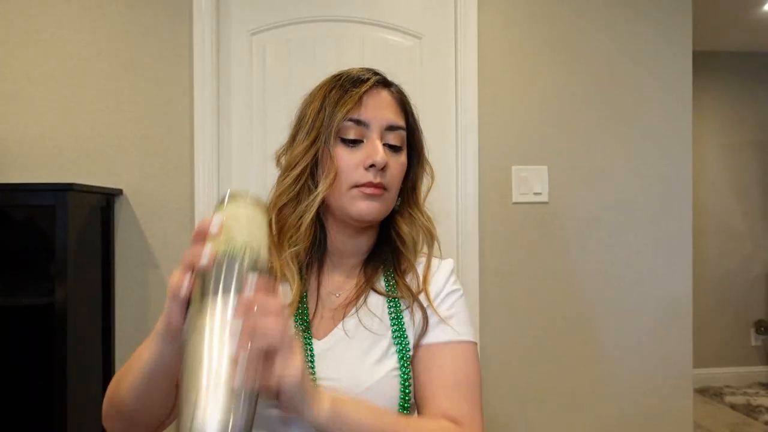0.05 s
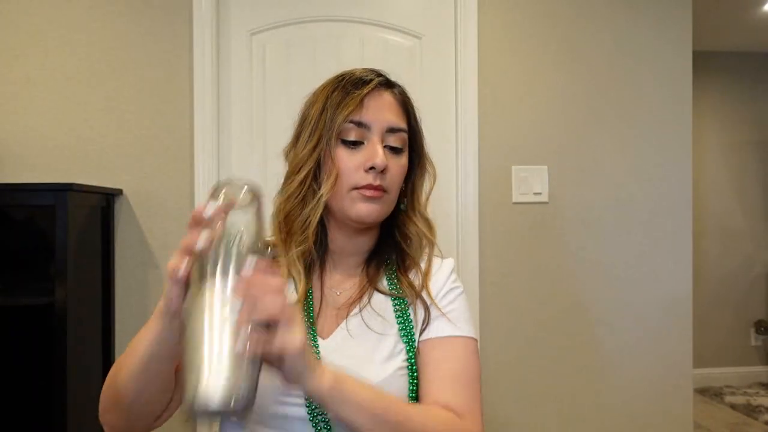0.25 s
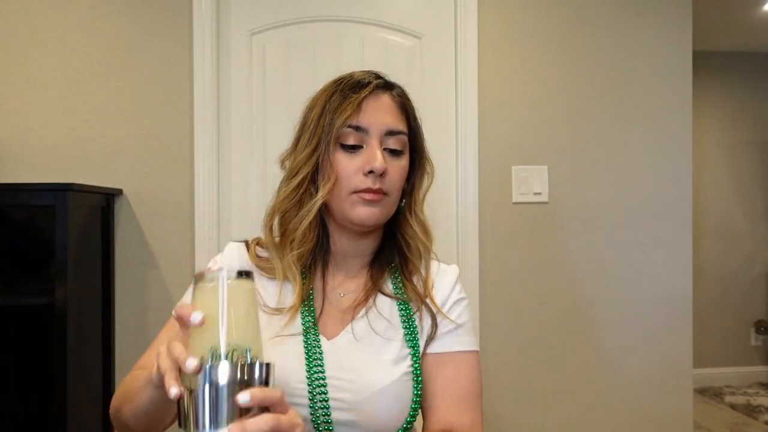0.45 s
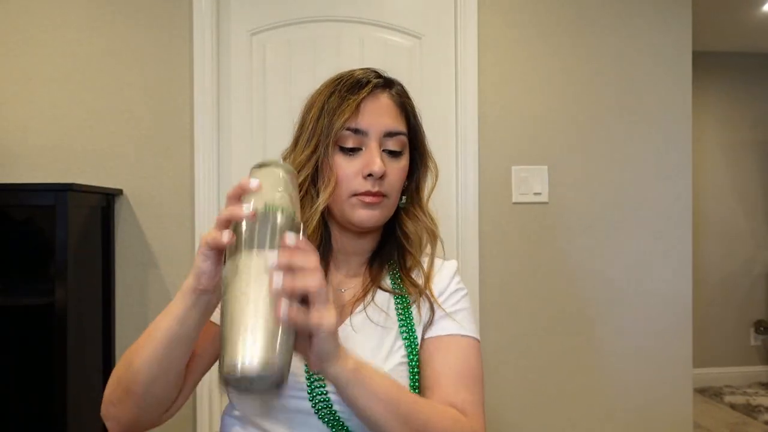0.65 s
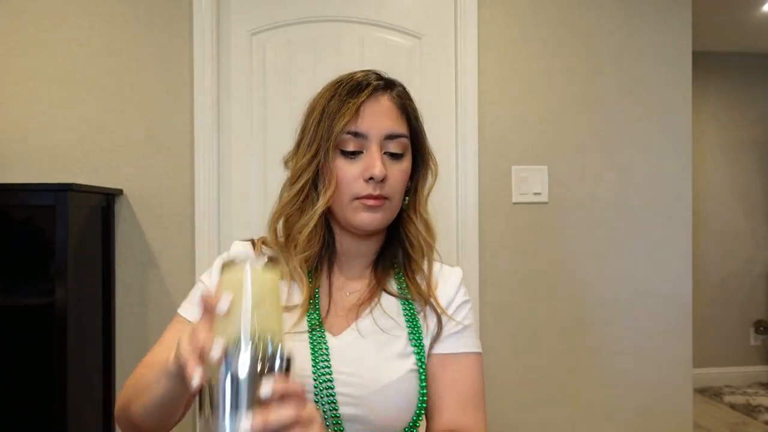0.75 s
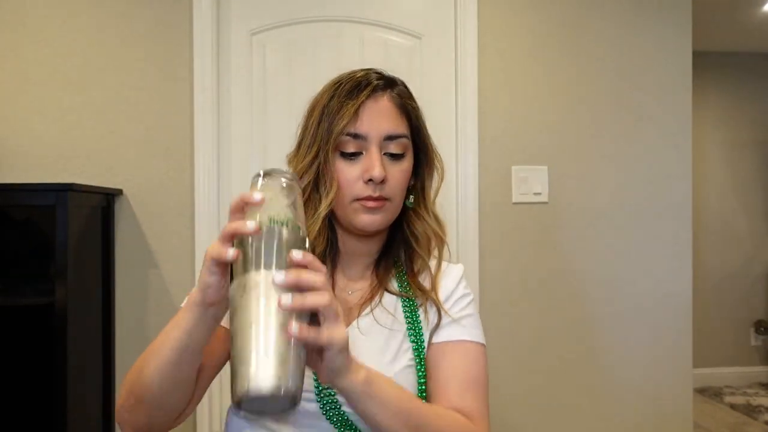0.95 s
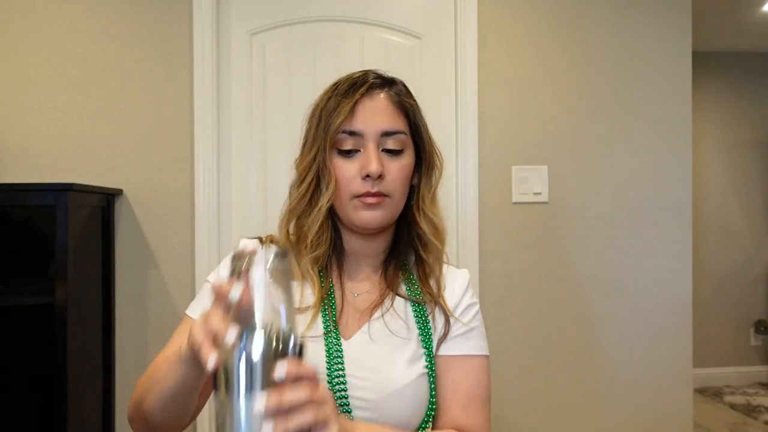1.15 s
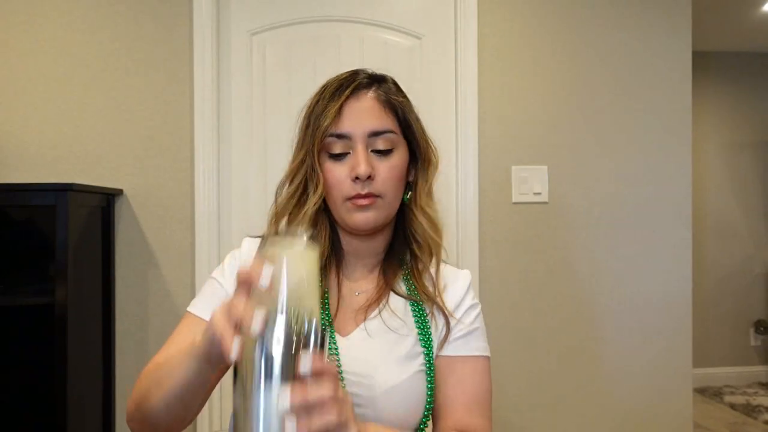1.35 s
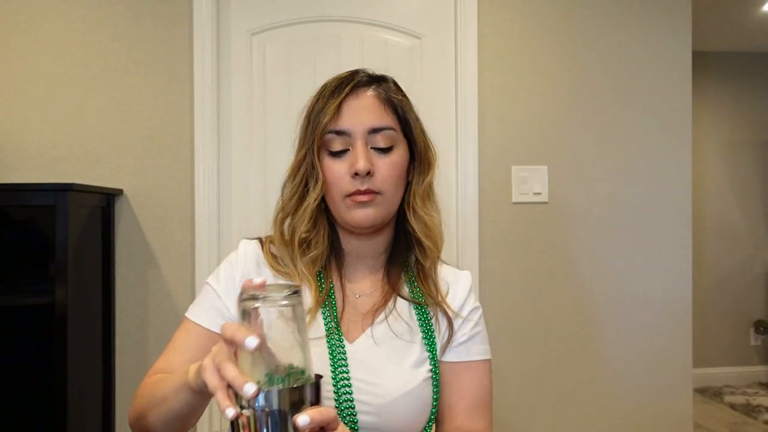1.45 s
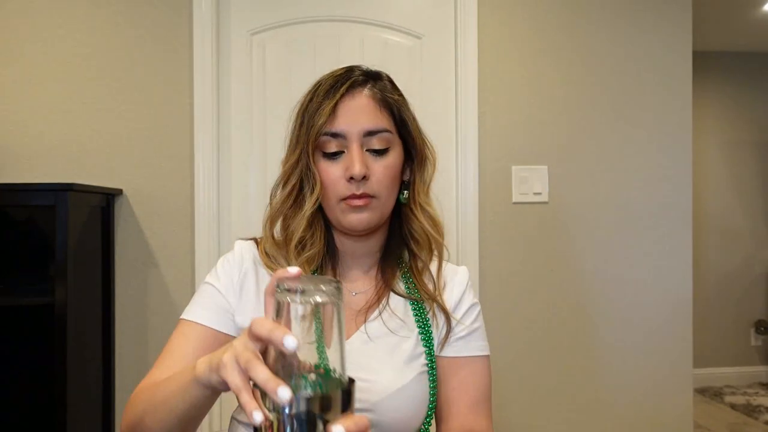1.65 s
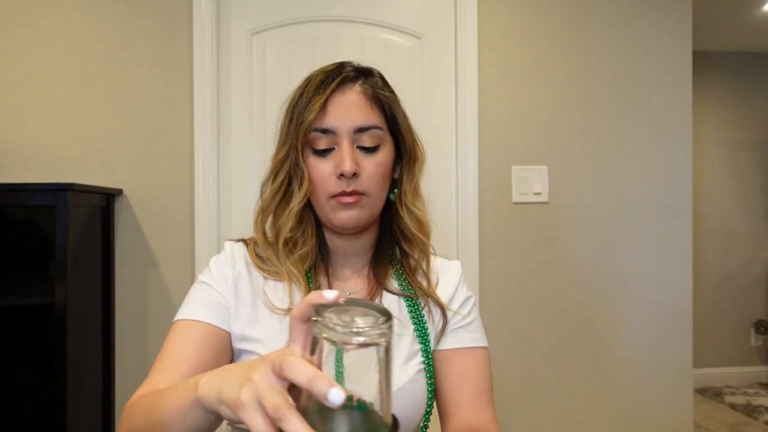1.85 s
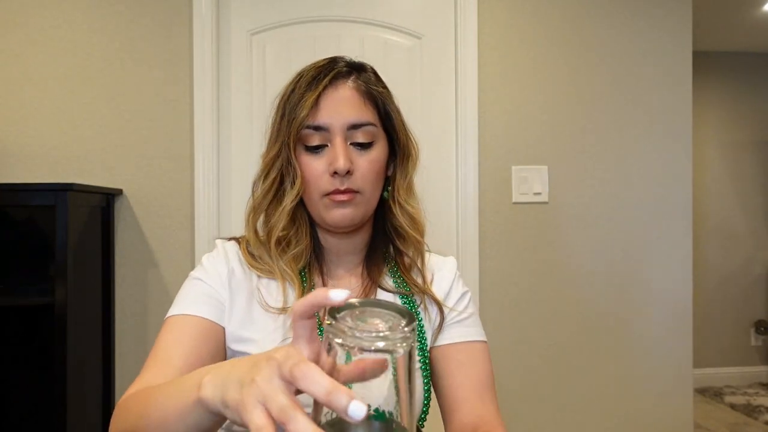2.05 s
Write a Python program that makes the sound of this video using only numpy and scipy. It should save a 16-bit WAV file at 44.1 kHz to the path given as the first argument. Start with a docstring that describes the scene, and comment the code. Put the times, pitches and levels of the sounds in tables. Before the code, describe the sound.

Ice cubes and liquid are shaken hard in a metal cocktail shaker from the start, about three shakes a second, each stroke end giving a wet thud, dense clatter and hissy spray. Sharp glassy cube hits crowd in from 0.1 s, with heavy base knocks near 0.2, 0.9 and 1.2 s. The last stroke lands at 1.5 s; final knocks at 1.7-1.9 s fade into kitchen reflections and low hum.

```python
"""In a kitchen, ice and liquid are shaken in a metal tin about three times a second; room hum lies beneath.
From the start each end of a stroke thuds, clatters and sprays (filtered random clicks) while cubes tumble.
Hard cube hits (cracks and short rings) join at once, knocks on the base (damped modes) from 0.2 s.
The last stroke lands at 1.5 s; the last knocks fall by 1.9 s and the room dies away.
Heard in stereo, a touch left of centre, with diffuse reflections 2.5 ms behind the direct sound."""
import sys
import numpy as np
from scipy import signal
from scipy.fft import rfft, irfft
from scipy.io import wavfile
from scipy.ndimage import uniform_filter1d, minimum_filter1d

SR = 44100
rng = np.random.default_rng(int(sys.argv[2]) if len(sys.argv) > 2 else 0)


def wav_out(sig):
    """Save sig, one row per channel (or a flat mono array), as 16-bit PCM at SR to the path in sys.argv[1]."""
    wavfile.write(sys.argv[1], SR, np.round(np.clip(np.atleast_2d(sig).T, -1, 1) * 32767).astype(np.int16))


N = 92742
T = np.arange(N) / SR   # time in s

# The load reaches the bottom and the top in turn; a negative delay puts the spray first:
# start_s [s], thud_db [dB], clatter_db [dB], spray_db [dB], spray_delay_s [s]
STROKE_LANDINGS = [(-.03, -35.5, -26, -28.5, -0.013), (0.063, -38.5, -30, -28.5, -0.016),
                   (0.228, -38.5, -23, -30, 0.033), (0.427, -38, -30.5, -31, -0.056),
                   (0.555, -29, -27, -28.5, 0.003), (.762, -51, -45, -32, -0.045),
                   (0.885, -35.5, -25, -26.5, 0.017), (1.014, -44.5, -32.5, -27, .003),
                   (1.19, -32, -25.5, -28, -0.0024), (1.359, -66, -35.5, -34, 0.0086),
                   (1.517, -29, -30.5, -34, 0.025)]
# How hard the loose cubes tumble: time_s [s], level_db [dB]
TUMBLE_LEVEL = [(0, -27), (.18, -33), (.28, -24.5), (.42, -30.5), (.6, -24.5), (.705, -27.5), (.77, -25.5),
                (.85, -28), (.93, -25), (1.25, -27.5), (1.345, -43), (1.39, -27), (1.655, -27.5),
                (1.7, -45), (1.785, -49), (1.815, -32.5), (2.1, -74)]
# Single hard hits of a cube on the wall: start_s [s], level_db [dB], pitch_hz [Hz], crack_db [dB re the ring]
HARD_CUBE_HITS = [(0.065, -26.5, 4650, 18), (0.0958, -6.5, 5230, -5), (.1100, -7.5, 3900, -6),
                  (0.144, -7.5, 4000, -9), (0.1896, -7.5, 3180, -17), (0.2049, -5.5, 3330, -3.5),
                  (0.3027, -12.5, 2340, -6), (0.3274, -9.5, 3270, -3), (0.381, -12, 3150, 6.5),
                  (.3996, -14, 2200, 2), (.4294, -7, 2300, -2), (0.4488, -7, 3070, -11),
                  (0.4604, -8.5, 4270, -8.5), (0.468, -7, 3160, -20), (0.512, -4, 3360, -26),
                  (0.5546, -8.5, 2340, -7), (0.5628, -8, 3280, -15), (0.576, -9.5, 2550, -9),
                  (.6010, -11.5, 2150, -2), (.6436, -11, 3600, -19), (.7190, -10, 2970, 10),
                  (0.7632, -6, 3680, -5.5), (0.78, -10, 3900, -17), (0.8266, -5.5, 3280, -13),
                  (.8605, -9, 3130, -7), (.8930, -19, 1960, 14.5), (.9420, -14, 4500, 8.5),
                  (1.0140, -19.5, 2150, 13.5), (1.0437, -8, 2190, -10), (1.065, -4, 4160, -3.5),
                  (1.1167, -12.5, 2140, 0), (1.1573, -12, 2130, -1), (1.17, -14.5, 6500, 7.5),
                  (1.215, -10.5, 3120, -13), (1.2761, -12, 1800, 4.5), (1.3260, -16.5, 4400, 9),
                  (1.3607, -6, 4160, -8.5), (1.382, -11, 6860, 8), (1.3997, -12, 2770, 2),
                  (1.4200, -11, 4280, -15), (1.5017, -18, 2150, -2), (1.5215, -9, 2250, 0.5),
                  (1.5316, -19, 2770, 4), (1.5452, -5.5, 2870, -8), (1.564, -6, 2880, -10),
                  (1.8384, -21, 3000, -27)]
# Heavy knocks on the base:
# start_s [s], level_db [dB], main_note_t60_s [s], overtones_db [dB re the main note]
BASE_KNOCKS = [(0.231, -7, 0.0052, -2), (.2380, -5, 0.0077, -15), (0.8858, 3, 0.0032, -11.5),
               (0.8884, -8.5, 0.0082, 0), (1.1794, -8, 0.025, -24), (1.183, -3, 0.032, -11),
               (1.2102, 0.5, 0.0085, -11), (1.6987, -2, 0.0069, -3), (1.7470, -23, 0.007, 14),
               (1.7982, -24, 0.025, 13), (1.8088, -3, 0.0052, 2.5), (1.905, -31, 0.0033, 14)]
# Modes of the base besides its main note: pitch_hz [Hz], level_db [dB], t60_s [s]
BASE_OVERTONES = [(628, -24.5, 0.053), (992, -27.5, 0.045), (1310, -11.5, 0.0058), (2150, -9, 0.0065),
                  (4440, -9.5, 0.0028)]
# Long rings of the tin, damped by the hands: pitch_hz [Hz], level_db [dB], t60_s [s]
TIN_RING_MODES = [(499.2, -44.5, 0.024), (587, -46.5, 0.2), (1255, -42.5, 0.034), (1672, -43, 0.21),
                  (1743, -61, 0.13), (1970, -54.5, 0.043), (2191, -41.5, 0.079), (2300, -68.5, 0.097),
                  (2972, -40, 0.025), (3190, -41.5, 0.033), (4240, -35, 0.049), (5500, -35.5, 0.023)]
# Colours, all as frequency_hz [Hz], density_db [dB per Hz]
# Thud of the liquid load
THUD_COLOUR = [(60, -33.5), (150, -31), (330, -7), (500, 4.5), (1000, 4.5), (1600, 4.5), (4000, -28)]
# Clatter of cubes at a landing
CLATTER_COLOUR = [(200, -39.5), (600, -18), (1100, 2), (1750, 3), (2300, 6), (3500, -3.5), (7000, -13.5)]
# Rattle of the tumbling cubes
RATTLE_COLOUR = [(100, -55), (400, -22), (1500, -8), (2200, 0.5), (2600, -3.5), (3150, 2), (4200, -5.5),
                 (4800, -9.5), (10000, -11), (16000, -29.5)]
# Spray and ice chips
SPRAY_COLOUR = [(500, -51), (2000, -20), (4000, 1.5), (6700, 5), (12000, -3.5), (16000, -18.5)]
# Brittle crack of a hard hit
CRACK_COLOUR = [(150, -67.5), (700, -5.5), (2000, -2.5), (7000, 3.5), (11000, -8.5), (16000, -16)]
# Room hum with its faint hiss
HUM_COLOUR = [(25, -5), (100, -4), (210, 8.5), (350, 8.5), (900, -10.5), (9000, -22)]
# Decay of the kitchen: frequency_hz [Hz], t60_s [s]
ROOM_DECAY = [(200, 1), (1500, 0.63), (4000, 0.57), (8000, 0.25), (14000, 0.04)]
# Reflections against the direct sound: frequency_hz [Hz], level_db [dB re direct]
ROOM_LEVEL = [(200, -6.5), (1500, -8), (4000, -6.5), (14000, -11.5)]
# Stereo width of the reflections: frequency_hz [Hz], side_db [dB re mid]
ROOM_WIDTH = [(200, -12), (700, -11), (5000, -3), (14000, 2.5)]
# Bands that the wall of the tin holds back briefly: centre_hz [Hz], width_hz [Hz]
WALL_DELAY_BANDS = [(2000, 1450), (3400, 3500), (6500, 2100)]

# Each envelope: rise in s, time from onset to the fall in s, fall in dB per s
THUD_ENVELOPE = dict(attack_s=0.021, hold_s=0.053, fall_db_per_s=178)
CLATTER_ENVELOPE = dict(attack_s=0.0015, hold_s=0.038, fall_db_per_s=112)
SPRAY_ENVELOPE = dict(attack_s=0.01, hold_s=0.031, fall_db_per_s=114)
CHATTER_ENVELOPE = dict(attack_s=0.00083, hold_s=0.0056, fall_db_per_s=483)
CHATTER_DB = -16           # small contacts set off by a hard hit, re that hit
CHATTER_PER_CRACK = 0.36   # dB of chatter per dB of crack: brittle hits scatter more chips
CUBE_RING_CYCLES, HIT_RING_CYCLES, CRACK_T60_S = 8.3, 28.4, 0.0064   # cycles to fall 60 dB
FIRM_DB, GENTLE_TOP_HZ = -35, 9600   # contacts weaker than this lose their treble
BUNCHES_PER_S, BUNCH_T60_S = 64, 0.01   # cubes collide in bunches
BUNCH_BASE = 0.62          # steady rattle between the bunches, before scaling to rms 1
BASE_NOTE_HZ = 1775
KNOCK_TOP_HZ = 8040        # wet, blunt contact
RADIATION_HZ = 154         # the small tin radiates little below this
SHAKE_HZ = 3.1
FIRST_ECHO_S, PAN_DB = 0.0025, 0.32   # left raised and right lowered by PAN_DB
HUM_DB = -57
LIMIT_DB, LIMIT_WINDOW_S = -5.5, 0.002
CUTOFF_HZ = 15900


def from_db(db):
    """Decibels to gain."""
    return 10 ** (np.asarray(db) / 20)


def rms_one(x):
    """Scale to an rms of 1."""
    return x / np.sqrt(np.mean(x ** 2) + 1e-20)


def at_hz(points, hz):
    """Read a table on a log-frequency axis."""
    frequency_hz, value = np.transpose(points)
    return np.interp(np.log(np.maximum(hz, 1)), np.log(frequency_hz), value)


def filtered(x, kind, hz, order=2):
    """Butterworth filter: low, high or band."""
    return signal.sosfilt(signal.butter(order, hz, kind, fs=SR, output="sos"), x)


def coloured(x, spectrum, size=2048):
    """Causal (minimum-phase) filter with the given spectrum."""
    level_db = at_hz(spectrum, np.fft.rfftfreq(size, 1 / SR))
    cepstrum = irfft(np.log(from_db(level_db)))
    # folding the cepstrum forward in time gives minimum phase
    cepstrum[1:size // 2] *= 2
    cepstrum[size // 2 + 1:] = 0
    impulse = irfft(np.exp(rfft(cepstrum)))
    return signal.fftconvolve(x, impulse)[:N]


def ring(x, hz, t60):
    """Two-pole resonator: a unit click sets a dying sine of height 1 ringing."""
    r = from_db(-60 / (t60 * SR))
    w = 2 * np.pi * hz / SR
    return signal.lfilter([0, np.sin(w)], [1, -2 * r * np.cos(w), r * r], x + 1e-18)


def struck(hz, t60, size=4096):
    """One dying sine; a small body radiates little below its pitch."""
    tone = np.sin(2 * np.pi * hz * T[:size]) * from_db(-60 * T[:size] / t60)
    return filtered(tone, "high", hz / 2)


def add(out, start_s, sound):
    """Mix a sound in at its start time."""
    i = int(np.clip(start_s * SR, 0, N - 1))
    out[i:i + len(sound)] += sound[:N - i]


def contacts(per_s, spread_db):
    """Random clicks of uneven size and either sign; rms 1."""
    born = rng.random(N) < per_s / SR
    size = from_db(-spread_db * rng.random(N))
    return rms_one(born * size * rng.choice([-1, 1], N))


def surges(times, levels_db, attack_s, hold_s, fall_db_per_s):
    """Envelope of a row of events: each swells, holds and dies; their powers add."""
    age = T - times[:, None]
    swell = np.clip(age / attack_s, 0, 1)
    fall_db = fall_db_per_s * np.maximum(age - hold_s, 0)
    gain = swell * from_db(levels_db[:, None] - fall_db)
    return np.sqrt(np.sum(gain ** 2, axis=0))


def room_hum(side_db=-14):
    """Low steady noise of the room, with a faint hiss, nearly central in the stereo image."""
    mid, side = (rms_one(coloured(rng.standard_normal(N), HUM_COLOUR)) for _ in range(2))
    return from_db(HUM_DB) * (mid + from_db(side_db) * side * [[1], [-1]])


def bunches(count=200):
    """Envelope of collisions at uneven intervals, each a sudden burst that dies fast; rms 1."""
    early, size = rng.random((count, 2)).T
    start_s = np.minimum((np.arange(count) + early) / BUNCHES_PER_S, N / SR)
    starts = np.zeros(N + SR)
    starts[(start_s * SR).astype(int)] = size
    keep = from_db(-60 / (BUNCH_T60_S * SR))
    bursts = signal.lfilter([1], [1, -keep], starts[:N] + 1e-18)
    return rms_one(BUNCH_BASE + bursts)


def strokes():
    """The load lands: a thud of liquid, a clatter of cubes, spray and ice chips, all dense random contacts."""
    start_s, thud_db, clatter_db, spray_db, spray_delay_s = np.transpose(STROKE_LANDINGS)
    thud = rms_one(coloured(contacts(per_s=900, spread_db=25), THUD_COLOUR))
    clatter = rms_one(coloured(contacts(per_s=1800, spread_db=19.5), CLATTER_COLOUR))
    spray = rms_one(coloured(contacts(per_s=6400, spread_db=40.5), SPRAY_COLOUR))
    thud = thud * surges(start_s, thud_db, **THUD_ENVELOPE)
    clatter = clatter * surges(start_s, clatter_db, **CLATTER_ENVELOPE)
    spray = spray * surges(start_s + spray_delay_s, spray_db, **SPRAY_ENVELOPE)
    return thud + bunches() * (clatter + spray)


def cube_rings(clicks, count=16):
    """Each contact rings for a few cycles at one of several pitches; rms 1."""
    dealt = rng.integers(0, count, N)
    rings = np.zeros(N)
    for k, hz in enumerate(np.geomspace(1500, 8000, count)):
        rings += hz * ring(clicks * (dealt == k), hz, CUBE_RING_CYCLES / hz)
    return rms_one(rings)


def tumbling_cubes(tick_db=-3):
    """Loose cubes tick and ring, duller when gentle; hard hits set them chattering."""
    clicks = contacts(per_s=2200, spread_db=9.5)
    rattle = rms_one(coloured(cube_rings(clicks) + from_db(tick_db) * clicks, RATTLE_COLOUR))
    gentle = filtered(rattle, "low", GENTLE_TOP_HZ, order=1)
    start_s, level_db, _, crack_db = np.transpose(HARD_CUBE_HITS)
    chatter_db = level_db + CHATTER_DB + CHATTER_PER_CRACK * crack_db
    chatter = surges(start_s, chatter_db, **CHATTER_ENVELOPE)
    tumble = from_db(np.interp(T, *np.transpose(TUMBLE_LEVEL)))
    # 1 = full treble, towards 0 = dull
    firm = np.minimum(np.hypot(tumble, chatter) / from_db(FIRM_DB), 1) ** 2
    blend = gentle + firm * (rattle - gentle)
    return blend * np.hypot(tumble * bunches(), chatter)


def tin_rings(x, ring_db=-8):
    """The long modes of the tin, fed by every contact."""
    push = np.diff(x, prepend=0)
    rings = np.zeros(N)
    for hz, level_db, t60 in TIN_RING_MODES:
        rings += from_db(level_db) * ring(push, hz, t60) * SR / (2 * np.pi * hz)
    return from_db(ring_db) * rings


def through_wall(x):
    """The wall smears each click by all-pass delay over about a millisecond and passes little bass."""
    for hz, width_hz in WALL_DELAY_BANDS:
        r = np.exp(-np.pi * width_hz / SR)
        poles = [1, -2 * r * np.cos(2 * np.pi * hz / SR), r * r]
        x = signal.lfilter(poles[::-1], poles, x)
    return filtered(x, "high", RADIATION_HZ)


def room_response(count=12):
    """Stereo diffuse reflections: noise dying band by band, wider in the treble."""
    t, echoes = T[:SR // 2], 0
    edges = np.geomspace(80, 18000, count + 1)
    for low, high in zip(edges, edges[1:]):
        hz = np.sqrt(low * high)
        decay = from_db(-60 * t / at_hz(ROOM_DECAY, hz)) * (t > FIRST_ECHO_S)
        mid, side = filtered(rng.standard_normal((2, len(t))), "band", [low, high])
        pair = mid + from_db(at_hz(ROOM_WIDTH, hz)) * side * [[1], [-1]]
        echoes = echoes + from_db(at_hz(ROOM_LEVEL, hz)) * pair * decay / np.linalg.norm(decay)
    return echoes


def kitchen(x, count=4):
    """The shaker moves, so its sound meets different reflections along the stroke."""
    # to and fro between several places, each with its own reflections
    place = (count - 1) * np.abs(2 * (SHAKE_HZ * T % 1) - 1)
    echoes = 0
    for k in range(count):
        share = np.sqrt(np.maximum(1 - np.abs(place - k), 0))
        echoes = echoes + signal.fftconvolve((x * share)[None], room_response(), axes=1)[:, :N]
    return echoes


def cube_hits(size=1024, overtone_db=-10):
    """Hard hits: a brittle noise crack and a short glassy ring with one inharmonic overtone."""
    rings, cracks = np.zeros((2, N))
    crack_fall = from_db(-60 * T[:size] / CRACK_T60_S)
    for start_s, level_db, hz, crack_db in HARD_CUBE_HITS:
        overtone_hz = hz * rng.uniform(1.325, 1.99)
        for partial_hz, partial_db in ((hz, 0), (overtone_hz, overtone_db)):
            partial = struck(partial_hz, HIT_RING_CYCLES / partial_hz)
            add(rings, start_s, from_db(level_db + partial_db) * partial)
        add(cracks, start_s, from_db(level_db + crack_db) * rng.standard_normal(size) * crack_fall)
    return rings + coloured(cracks, CRACK_COLOUR)


def knocks():
    """Heavy cubes strike the base, whose modes the liquid damps quickly."""
    out = np.zeros(N)
    overtones = sum(from_db(level_db) * struck(hz, t60) for hz, level_db, t60 in BASE_OVERTONES)
    for start_s, level_db, t60, overtones_db in BASE_KNOCKS:
        knock = struck(BASE_NOTE_HZ, t60) + from_db(overtones_db) * overtones
        add(out, start_s, from_db(level_db) * knock)
    return filtered(out, "low", KNOCK_TOP_HZ)


def scene():
    """All contacts ring the tin; the shaker sounds in the kitchen, over the room hum."""
    ice = strokes() + tumbling_cubes() + cube_hits() + knocks()
    shaker = through_wall(ice + tin_rings(ice))
    return (shaker + kitchen(shaker)) * from_db([[PAN_DB], [-PAN_DB]]) + room_hum()


def record(dry):
    """A fast stereo-linked limiter holds the highest peaks down, then the top is cut."""
    width = max(int(LIMIT_WINDOW_S * SR), 3)
    allowed = np.minimum(1, from_db(LIMIT_DB) / (np.abs(dry).max(axis=0) + 1e-9))
    gain = uniform_filter1d(minimum_filter1d(allowed, width), width)
    top_cut = signal.ellip(12, .1, 80, CUTOFF_HZ, fs=SR, output="sos")
    return signal.sosfilt(top_cut, dry * gain)


dry = scene()
out = record(dry)
wav_out(out)
```